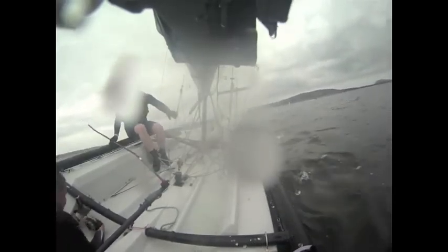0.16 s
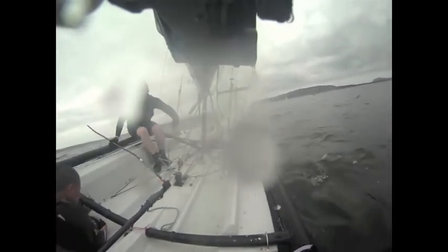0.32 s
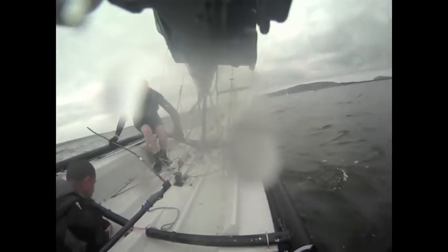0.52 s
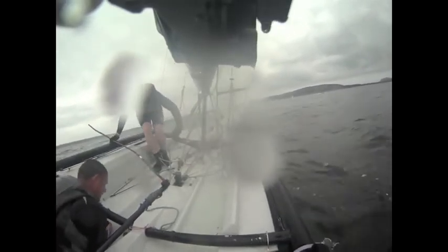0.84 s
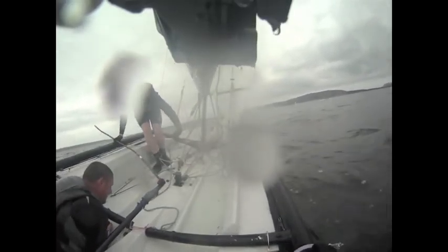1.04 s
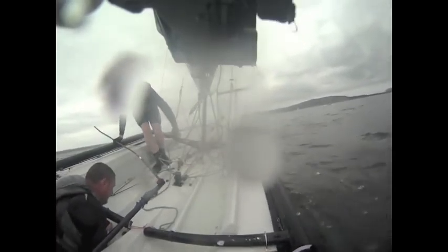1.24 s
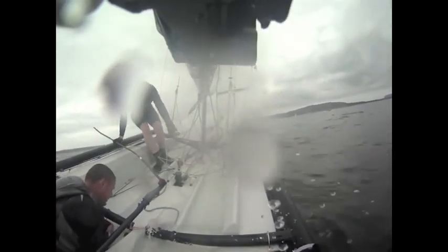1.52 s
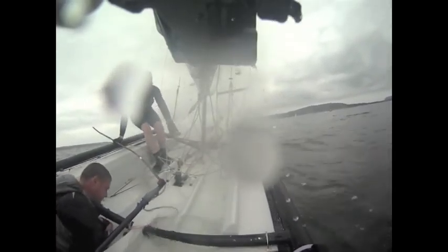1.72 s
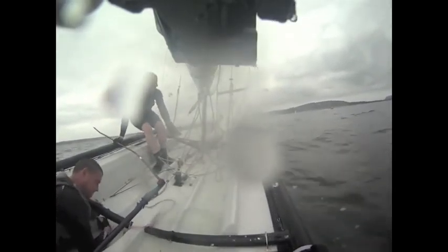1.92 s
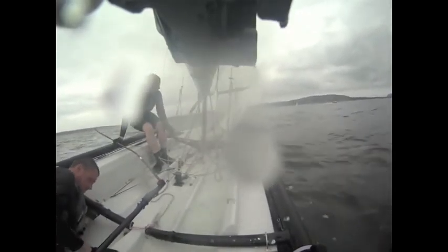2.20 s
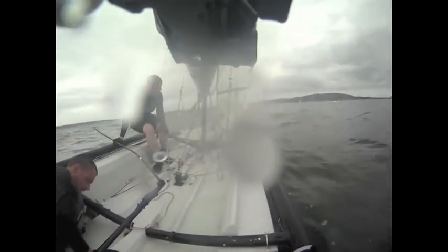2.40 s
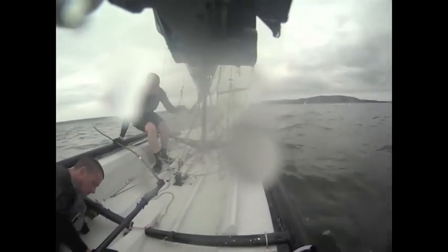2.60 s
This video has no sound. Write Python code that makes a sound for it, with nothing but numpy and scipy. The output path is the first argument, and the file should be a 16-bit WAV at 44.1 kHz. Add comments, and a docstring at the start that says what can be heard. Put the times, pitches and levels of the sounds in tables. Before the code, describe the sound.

Water rushes, gurgles and slaps along a small sailing boat's hull while gusts make the sealed camera housing boom low; a hard thump comes early, then spray bursts, sharp drops and late knocks, close and boxy.

```python
"""On a sailing boat under way, heard from inside a small camera's sealed housing. Gusts and hull shudder make
the housing boom near 85 Hz, a resonance that swings at a wavering pitch, over lumpy wind rumble. Water rushes
past as patchy noise, ringing grains, slaps and spray, all coloured by the housing; hard drops ring its shell.
Waves knock the hull, and one hard thump trips the gain control. The recorder samples at 12 kHz and holds each
value, which mirrors the sound into the treble."""
import sys
import numpy as np
from scipy import signal
from scipy.fft import rfft, irfft
from scipy.io import wavfile
from scipy.ndimage import uniform_filter1d

SR = 44100
rng = np.random.default_rng(int(sys.argv[2]) if len(sys.argv) > 2 else 0)


def output_pcm(signal):
    """Save a mono or channel-first signal as 16-bit PCM at the path in sys.argv[1].

    Samples are clipped to [-1, 1] before scaling.
    """
    pcm = np.clip(np.atleast_2d(signal).T, -1, 1) * 32767
    wavfile.write(sys.argv[1], SR, np.round(pcm).astype(np.int16))


def invert_db(x):
    """Field ratio 10**(x/20) for x, a level in decibels (scalar or array-like)."""
    u = np.asarray(x, float) / 20
    return 10 ** u


N = 121275

# Colour that the housing gives to water and cracks. Each row: frequency in Hz, relative density in dB per Hz.
HOUSING_COLOUR = [(150, -36.5), (250, -12), (322, 1), (368, -35), (398, -6.5), (533, -8), (578, -1),
                  (795, -1.5), (849, -6), (907, -2.5), (1140, -10), (1330, -9), (1500, -21), (1720, -18.5),
                  (2040, -9), (2240, -14.5), (2630, -13), (2850, -17), (3250, -13.5), (4020, -12.5),
                  (4350, -17.5), (4840, -17), (5990, -34), (7790, -36.5)]
BUFFET_DB = -31.5  # rms of the steady boom between gusts


def evened(x):
    """Scales x to rms 1."""
    return x / np.sqrt(np.mean(x ** 2) + 1e-20)


def read(points, hz):
    """Reads a spectrum table on a log-frequency axis."""
    f, value = np.transpose(points)
    return np.interp(np.log(hz + 1), np.log(f + 1), value)


def curve(tables, column):
    """Draws one column of the joined tables as a line over time, per sample."""
    rows = np.vstack(tables)
    return np.interp(np.arange(N) / SR, rows[:, 0], rows[:, column])


def add(mix, s, sound):
    """Mixes a sound in at s seconds, cut at the end of the mix."""
    part = mix[round(s * SR):][:len(sound)]
    part += sound[:len(part)]


def slow(hz):
    """Slow random drift of rms 1, up to about hz."""
    spectrum = rfft(rng.standard_normal(N))
    f = np.fft.rfftfreq(N, 1 / SR)
    return evened(irfft(spectrum * (f > 0) * np.exp(-(f / hz) ** 2), N))


def coloured(x, points, lo_hz=0., hi_hz=1e5):
    """Filters x through a spectrum table and cuts it to a band."""
    f = np.fft.rfftfreq(len(x), 1 / SR)
    band = 1 / (1 + (lo_hz / (f + 1)) ** 16) / (1 + (f / hi_hz) ** 16)
    return irfft(rfft(x) * invert_db(read(points, f)) * band, len(x))


def rumble(swell):
    """Lumpy wind pressure: low noise whose level partly follows the gusts."""
    # Spectrum of the wind pressure. Each row: frequency in Hz, relative density in dB per Hz.
    pressure = [(15, 7.5), (32, 3.5), (70, -6.5), (87, -18.5), (110, -2), (222, -15.5), (304, -22),
                (400, -39), (520, -100)]
    level_db, follow, lumps_db = -31.5, 0.5, 2  # rms level, share of the gusts' rise, rms of the lumps
    gust_lift = (1 + (swell / invert_db(BUFFET_DB)) ** 2) ** (follow / 2)
    lift = gust_lift * invert_db(lumps_db * slow(25))
    noise = evened(coloured(rng.standard_normal(N), pressure))
    return invert_db(level_db) * evened(lift) * noise


def grains(per_s, notes_hz):
    """Short rings on the given notes at random moments; a few are large."""
    spread_db, cycles = 4.5, 17.2  # mean of the random boost; cycles in which a ring decays by exp(-2)
    boost = np.minimum(rng.exponential(1, N), 4)
    size = invert_db(spread_db * boost) * (rng.random(N) < per_s / SR)
    kind = rng.integers(0, len(notes_hz), N)
    out = np.zeros(N)
    for k, hz in enumerate(notes_hz):
        c = np.arange(int(3 * cycles * SR / hz)) * hz / SR  # time in cycles
        grain = (1 - np.exp(-2 * c)) * np.exp(-2 * c / cycles) * np.sin(2 * np.pi * c)
        # the square root evens the energy of short and long rings
        out += signal.oaconvolve(size * (kind == k), grain * np.sqrt(hz))[:N]
    return evened(out)


def patchy_noise():
    """Noise whose level wanders in small patches of time and frequency."""
    patch_db = 3.5
    frames = N // 64 + 5
    a, b, patches = rng.standard_normal((frames, 129, 3)).T
    patches = uniform_filter1d(patches, size=4, axis=0)  # across frequency
    patches = evened(uniform_filter1d(patches, size=16, axis=1))  # across time
    spectrum = (a + 1j * b) * invert_db(patch_db * patches)
    return evened(signal.istft(spectrum, nperseg=256, noverlap=192)[1][:N])


def rush():
    """Rushing water: patchy noise with low gurgling grains and fine ticks, flickering apart in two bands."""
    # Flow past the housing. Each row: time in seconds, gurgle level in dB, hiss level in dB.
    flow = [
        [(0.0, -48, -59.5), (0.098, -51, -53), (0.24, -49, -55)],
        [(0.43, -51, -54), (0.65, -48, -48.5), (2.04, -53, -56), (2.165, -46.5, -54), (2.27, -51.5, -54),
         (2.335, -43, -52.5), (2.42, -50, -54.5), (2.75, -59, -48.5)],
    ]
    # Notes of the housing that droplets ring, in Hz.
    tick_hz = [2056, 2404, 3174, 4046, 4796]
    split_hz, detune = 1420, 0.036  # band split; each tick note also sounds this fraction below and above
    gurgle_flicker_db, hiss_flicker_db = 2.5, 1.5
    tick_notes = np.outer(tick_hz, 1 + detune * np.arange(-1, 2)).ravel()
    water = patchy_noise()
    low = water + invert_db(-19) * grains(120, np.geomspace(400, 1250, num=24))
    high = water + invert_db(-11.5) * grains(900, tick_notes)
    low = low * invert_db(gurgle_flicker_db * slow(25))
    high = high * invert_db(hiss_flicker_db * slow(63))
    gurgle = evened(coloured(low, HOUSING_COLOUR, hi_hz=split_hz))
    hiss = evened(coloured(high, HOUSING_COLOUR, lo_hz=split_hz))
    return invert_db(curve(flow, column=1)) * gurgle + invert_db(curve(flow, column=2)) * hiss


def splashes():
    """Low slaps of water and higher bursts of spray: noise that starts suddenly and dies fast."""
    # Low gurgling slaps. Each row: start in seconds, level before trim in dB, 60 dB decay in seconds.
    slap_rows = [(0.193, -35.5, 0.17), (0.235, -29.5, 0.048), (0.322, -24.5, 0.098), (0.436, -29, 0.13),
                 (0.486, -30.5, 0.12), (0.601, -29, 0.2), (0.719, -33.5, 0.17), (0.86, -32.5, 0.085),
                 (1.012, -38, 0.14), (1.145, -28, 0.068), (1.374, -30.5, 0.07), (1.434, -29.5, 0.039),
                 (1.618, -32.5, 0.12), (1.704, -36.5, 0.069), (2.001, -26, 0.057), (0.894, -32.5, 0.05),
                 (1.224, -36, 0.1), (2.508, -31, 0.04), (2.703, -38, 0.23)]
    # Bursts of spray. Each row: start in seconds, middle and high level before trim in dB.
    spray_rows = [(0.171, -43, -44.5), (0.188, -34.5, -69), (0.496, -32.5, -42), (0.6584, -28.5, -35.5),
                  (0.673, -36, -66), (0.781, -42, -41), (0.811, -27.5, -37), (0.861, -30.5, -41.5),
                  (1.0082, -32, -42.5), (1.0674, -52, -39.5), (1.1844, -37, -42), (1.457, -52, -35.5),
                  (1.517, -50, -42.5), (1.5715, -30, -63), (2.5704, -56, -42)]
    # Trim of the low, middle and high band, in dB.
    trim_db = (-6.5, -9, 1)
    slap_rise_s, spray_rise_s, spray_t60_s = 0.0015, 0.0029, 0.048
    edges_hz = (0, 1476, 2840, SR)
    t = np.arange(SR // 4) / SR
    gates = np.zeros((3, N))  # loudness of the low, middle and high band
    rise = np.minimum(t / slap_rise_s, 1)
    for s, db, t60 in slap_rows:
        add(gates[0], s, invert_db(db - 60 * t / max(t60, .01)) * rise)
    rise = np.minimum(t / spray_rise_s, 1)
    for s, middle_db, high_db in spray_rows:
        add(gates[1], s, invert_db(middle_db - 60 * t / spray_t60_s) * rise)
        add(gates[2], s, invert_db(high_db - 60 * t / spray_t60_s) * rise)
    out = np.zeros(N)
    for k, gate in enumerate(gates):
        noise = coloured(rng.standard_normal(N), HOUSING_COLOUR, edges_hz[k], edges_hz[k + 1])
        out += invert_db(trim_db[k]) * gate * evened(noise)
    return out


def drops():
    """Each hard drop breaks into three quick taps that ring the modes of the plastic shell."""
    # Hard drops. Each row: start in seconds, level in dB, tilt below and above the pivot in dB per octave.
    hits = [(1.449, -28.5, -5, -30), (1.601, -27, -0.5, -7), (1.8943, -20, -3, 0), (2.4109, -28.5, 6, -17)]
    # Modes of the shell. Each row: frequency in Hz, level in dB, 60 dB decay in seconds.
    shell_modes = [(313, -15, 0.031), (814, -14.5, 0.033), (1370, -11.5, 0.025), (1917, 0, 0.012),
                   (2107, -1, 0.017), (2520, -6, 0.02), (3547, -8, 0.021)]
    pivot_hz, rise_s, scatter_s, next_tap_db = 2080, 0.0005, 0.004, -4
    hz, mode_db, t60 = np.transpose(shell_modes)[:, :, None]
    octaves = np.log2(hz / pivot_hz)
    t = np.arange(SR // 10) / SR
    rise = np.minimum(t / rise_s, 1) ** 2
    out = np.zeros(N)
    for s, drop_db, below_db, above_db in hits:
        tilt_db = np.where(octaves < 0, below_db, above_db) * octaves
        for k in range(3):
            chance = rng.random((len(shell_modes), 1))
            tap_db = drop_db + mode_db + tilt_db + next_tap_db * k - 1.3 * chance
            ring = invert_db(tap_db - 60 * t / t60) * np.sin(2 * np.pi * hz * t)
            add(out, s + k * scatter_s * chance[0, 0], ring.sum(0) * rise)
    return out


def thuds():
    """Waves knock the hull: short low rings with a brief overtone."""
    # Knocks. Each row: start in seconds, level before the rise in dB, pitch in Hz, 60 dB decay in seconds.
    knocks = [(0.114, -26.5, 186.5, 0.46), (0.2413, -11.5, 109, 0.054), (0.9, -34.5, 255, 0.061),
              (0.944, -26.5, 166, 0.14), (1.239, -25, 151.4, 0.33), (1.374, -26.5, 191, 0.08),
              (2.148, -26, 180, 0.056), (2.483, -10.5, 222, 0.023), (2.5099, -8.5, 274, 0.014),
              (2.252, -40, 296, 0.18)]
    t = np.arange(SR // 4) / SR
    rise = 1 - np.exp(-t / 0.0023)
    out = np.zeros(N)
    for s, db, hz, t60 in knocks:
        fade = invert_db(db - 60 * t / np.clip(t60, .02, .4))  # decay kept within 0.02 to 0.4 s
        overtone = 0.2 * np.exp(-t / 0.016) * np.sin(2 * np.pi * 2.11 * hz * t)
        add(out, s, fade * rise * (np.sin(2 * np.pi * hz * t) + overtone))
    return out


def thump():
    """One hard thump: a pressure dip that snaps back into a low rebound, with a crack of noise."""
    dip_s, dip_db, fall_s, snap_s = 0.2598, -2, 0.0021, 0.0016  # time and level of the dip, its two widths
    rebound_hz, rebound_t60_s, rebound_size = 76, 0.58, 0.43
    crack_db, crack_lag_s, crack_width_s = -32.5, 0.001, 0.00054
    u = np.arange(N) / SR - dip_s
    dip = np.exp(-.5 * (u / np.where(u < 0, fall_s, snap_s)) ** 2)
    late = np.maximum(u - snap_s, 0)
    rebound = np.sin(2 * np.pi * rebound_hz * late) * invert_db(-60 * late / rebound_t60_s)
    noise = evened(coloured(rng.standard_normal(N), HOUSING_COLOUR, lo_hz=890))
    crack = invert_db(crack_db) * np.exp(-.5 * ((u - crack_lag_s) / crack_width_s) ** 2) * noise
    return invert_db(dip_db) * (rebound_size * rebound - dip) + crack


def gusts():
    """Swell and pitch of the boom: bell-shaped gusts whose powers add, pitch drawn to the strongest."""
    # Gusts that set the housing booming. Each row: middle in seconds, rms level at the middle in dB,
    # pitch in Hz, length in seconds between the points where power is down to 1/e.
    gust_rows = [(0.082, -27.5, 91.85, 0.094), (0.142, -20.5, 89.93, 0.052), (0.236, -18, 81.5, 0.02),
                 (0.342, -18, 82.08, 0.06), (0.547, -17, 78.3, 0.01), (0.677, -14, 98.82, 0.0471),
                 (0.717, -15.5, 85.7, 0.02), (0.815, -14.5, 90.4, 0.03), (0.855, -21.5, 76, 0.067),
                 (0.992, -13.5, 78.9, 0.053), (1.083, -19, 86.72, 0.039), (1.152, -17.5, 84, 0.025),
                 (1.269, -26, 106.9, 0.0533), (1.46, -20.5, 81.3, 0.073), (1.622, -52.5, 71.2, 0.03),
                 (1.936, -36, 83.1, 0.13), (2.076, -33, 90.96, 0.18), (2.173, -12, 86.6, 0.027),
                 (2.331, -22, 83.3, 0.11), (2.362, -10.5, 82.9, 0.023), (2.434, -22.5, 84, 0.11),
                 (2.517, -16.5, 89.5, 0.043)]
    rest_hz = 84  # pitch between gusts
    t = np.arange(N) / SR
    s, db, hz, length = np.transpose(gust_rows)[:, :, None]
    power = invert_db(2 * db) * np.exp(-(2 * (t - s) / length) ** 2)
    total = power.sum(0)
    rest = invert_db(2 * BUFFET_DB)
    pitch_hz = ((power * hz).sum(0) + rest * rest_hz) / (total + rest)
    return np.sqrt(total), pitch_hz


def boom(swell, hz):
    """The housing swings at a wavering pitch in each gust; steady buffeting excites the same resonance."""
    pole_width_hz, waver = 36, 0.06  # width of each of two equal poles; rms pitch waver as a fraction
    turn = np.exp(2j * np.pi * np.cumsum(hz * (1 + waver * slow(16.4))) / SR)
    r = np.exp(-np.pi * pole_width_hz / SR)
    noise = rng.standard_normal(N) + 1j * rng.standard_normal(N)
    fuzz = signal.lfilter([1], [1, -2 * r, r * r], noise)
    buffeting = evened((fuzz * turn).real)  # narrow noise moved up to the boom's pitch
    return np.sqrt(2) * swell * turn.real + invert_db(BUFFET_DB) * buffeting


def scene():
    """Mixes wind, water, knocks and the booming housing."""
    swell, hz = gusts()
    water = rush() + splashes() + drops()
    knocking = thuds() + thump()
    return (rumble(swell) + water + knocking + boom(swell, hz))[None]


def gain_control(x):
    """A peak over the trip level cuts the gain after a lag; the gain holds, then creeps back."""
    trip_db, cut_most_db, lag_s, hold_s, recover_db_per_s = -4.5, 18, 0.012, 0.018, 117
    t = np.arange(N) / SR
    last_peak_s = np.maximum.accumulate(np.where(abs(x) > invert_db(trip_db), t, -9))  # -9: no peak yet
    since_cut = np.interp(t - lag_s, t, t - last_peak_s, left=9)
    cut_db = np.clip(cut_most_db - recover_db_per_s * (since_cut - hold_s), 0, cut_most_db)
    return x * invert_db(-uniform_filter1d(cut_db, size=330))


def sample_and_hold(x):
    """Holding each sample leaves stairs, whose edges mirror the sound above half the sampling rate."""
    hold_hz = 12000
    samples = signal.resample_poly(x, hold_hz, SR, window=("kaiser", 9))
    held = np.repeat(samples, 4)
    return signal.resample_poly(held, SR, 4 * hold_hz)[:N]


def low_pass(x):
    """Removes everything above the highest recorded frequency."""
    return signal.sosfilt(signal.butter(12, 15800, fs=SR, output="sos"), x)


def record(dry):
    """The recorder: gain control, 12 kHz sample-and-hold and a steep treble edge."""
    x = sample_and_hold(gain_control(dry[0]))
    x = signal.oaconvolve(x, signal.firwin(255, 15350, fs=SR), "same")  # low-pass at 15350 Hz
    return low_pass(x[None])


dry = scene()
out = record(dry)
output_pcm(out)
```